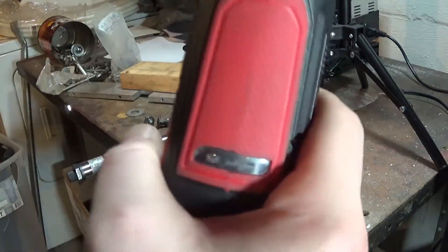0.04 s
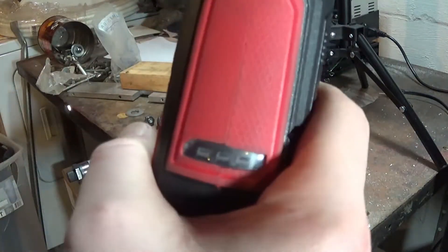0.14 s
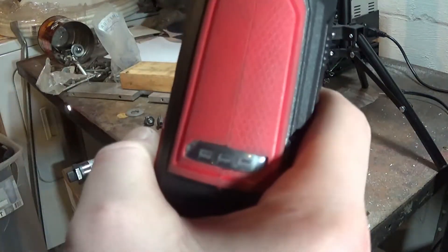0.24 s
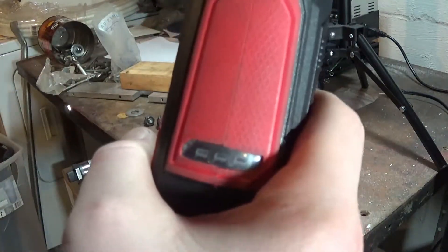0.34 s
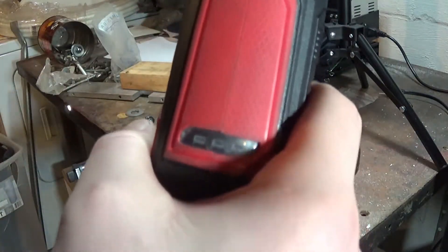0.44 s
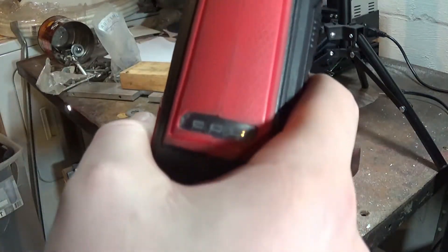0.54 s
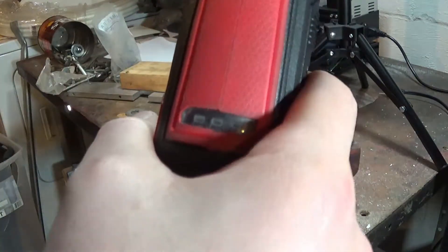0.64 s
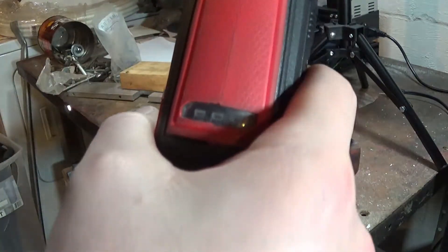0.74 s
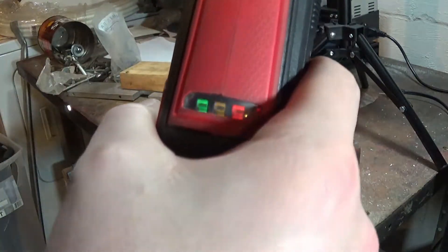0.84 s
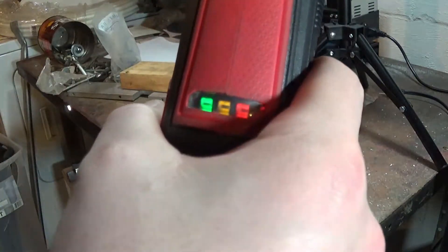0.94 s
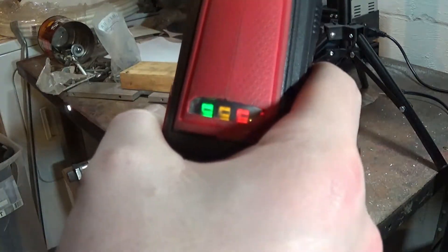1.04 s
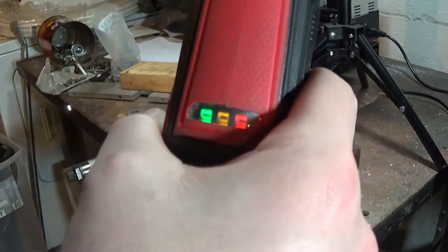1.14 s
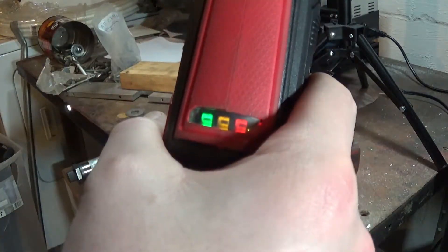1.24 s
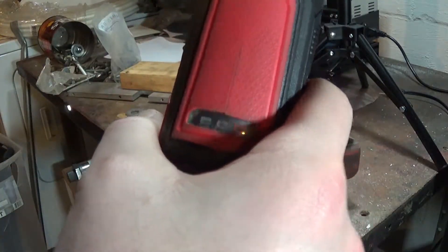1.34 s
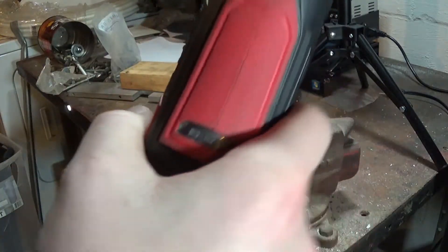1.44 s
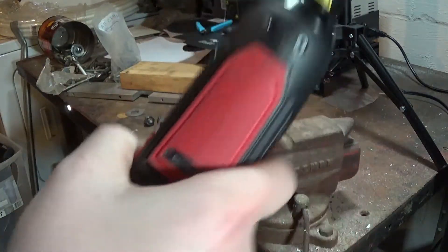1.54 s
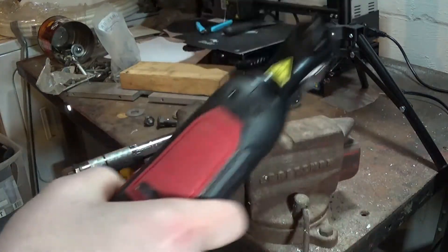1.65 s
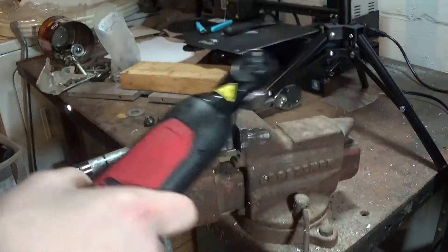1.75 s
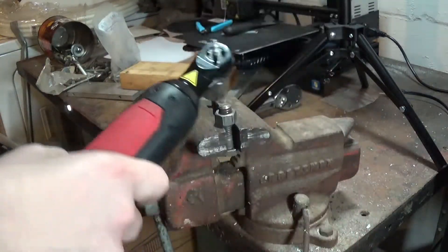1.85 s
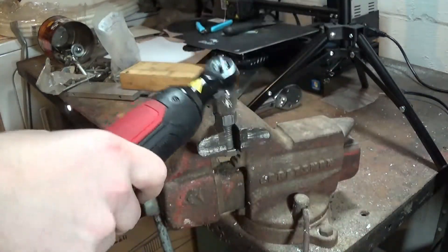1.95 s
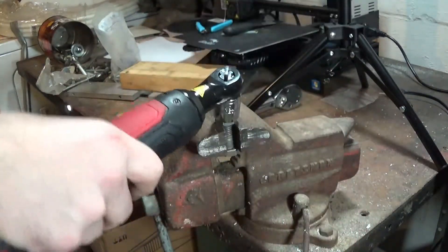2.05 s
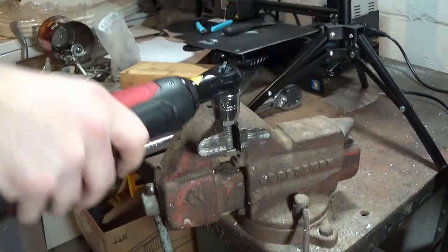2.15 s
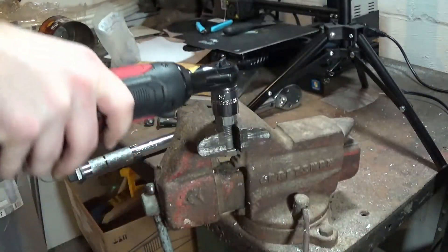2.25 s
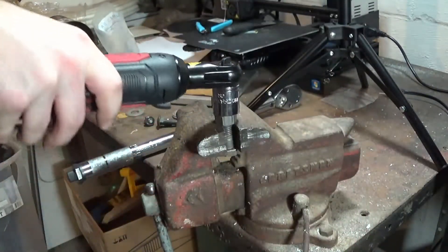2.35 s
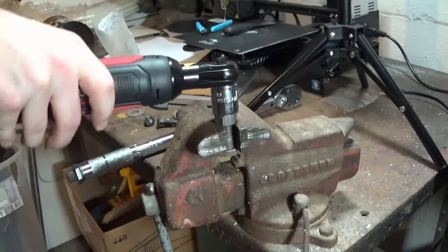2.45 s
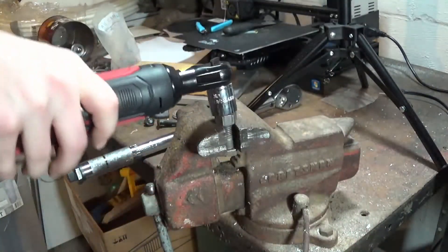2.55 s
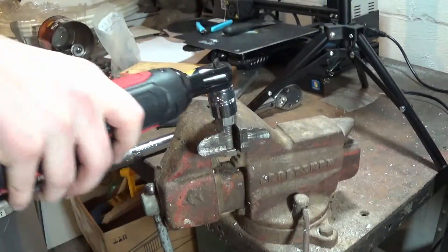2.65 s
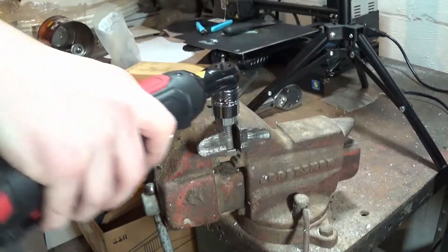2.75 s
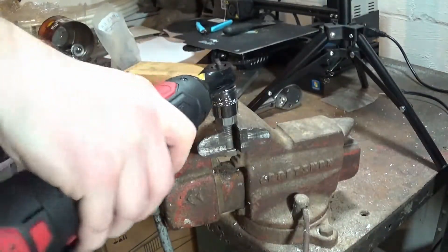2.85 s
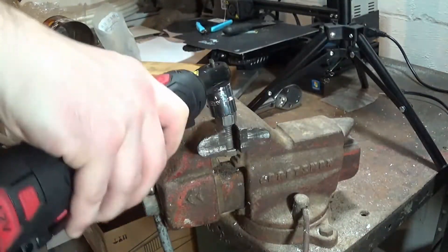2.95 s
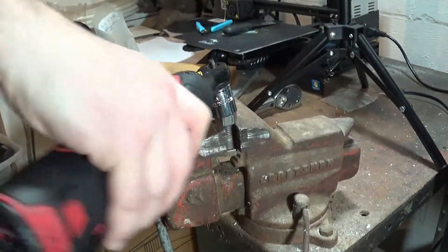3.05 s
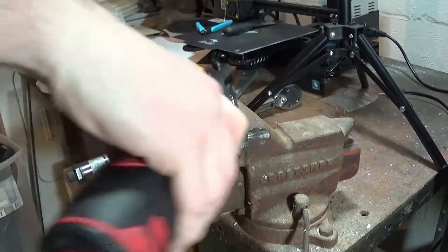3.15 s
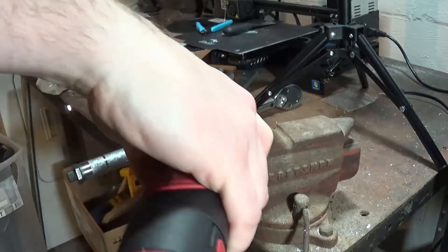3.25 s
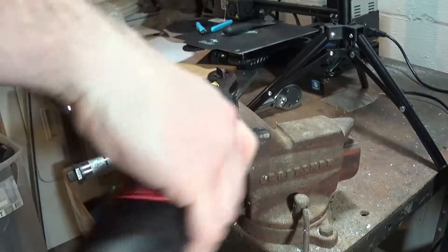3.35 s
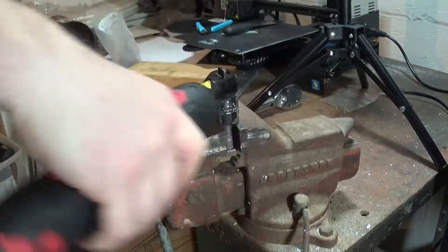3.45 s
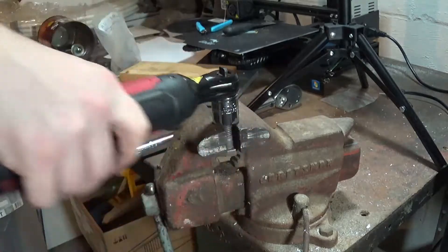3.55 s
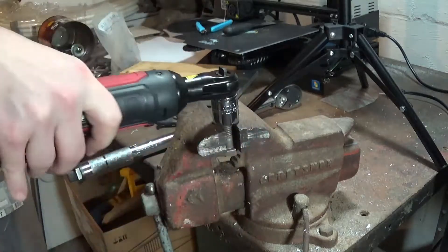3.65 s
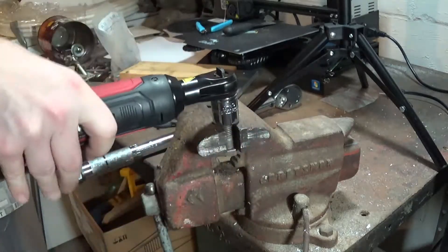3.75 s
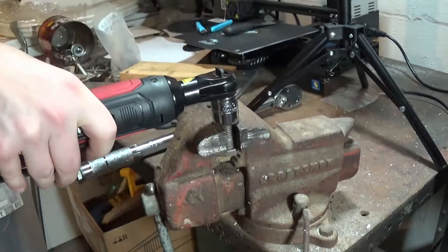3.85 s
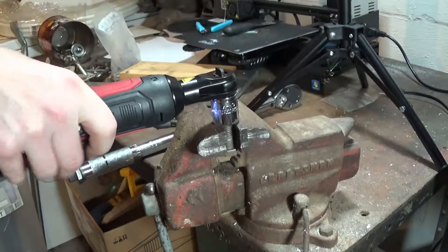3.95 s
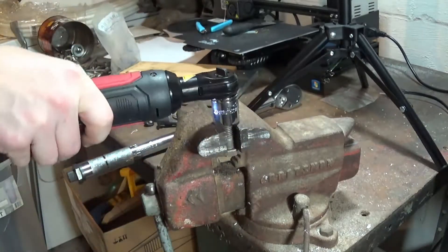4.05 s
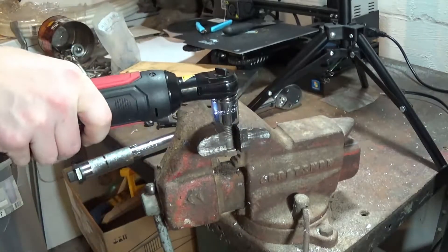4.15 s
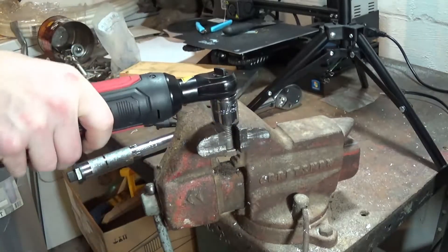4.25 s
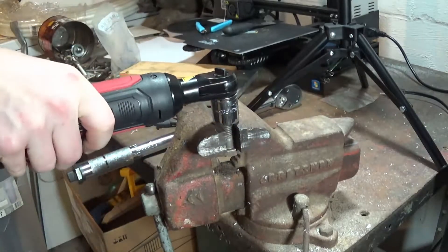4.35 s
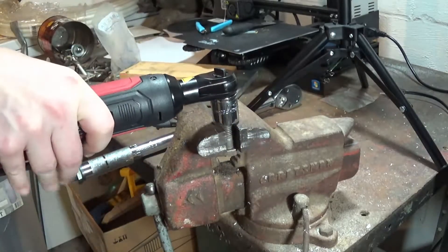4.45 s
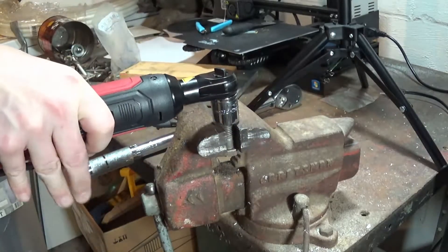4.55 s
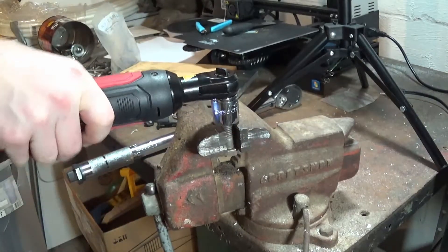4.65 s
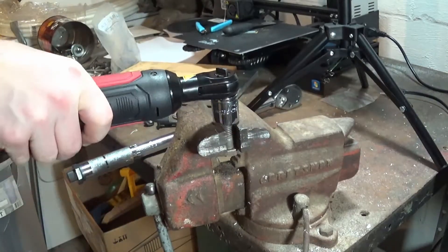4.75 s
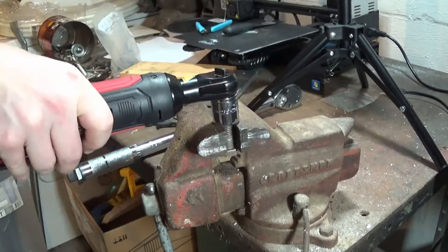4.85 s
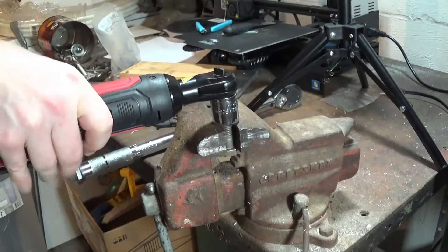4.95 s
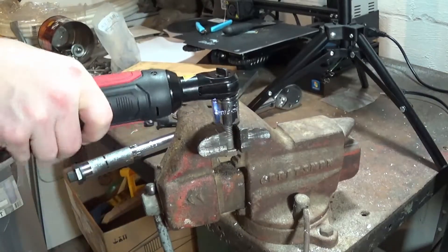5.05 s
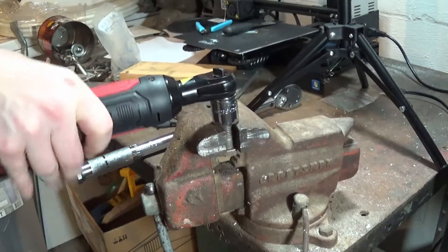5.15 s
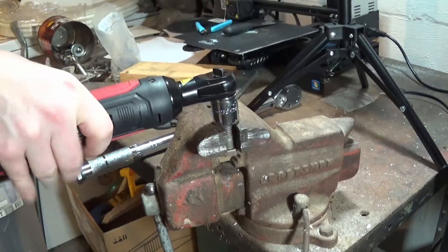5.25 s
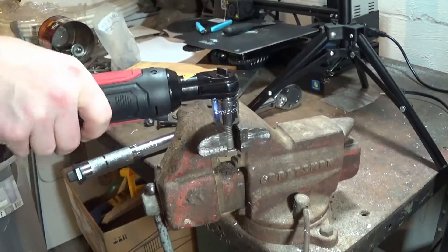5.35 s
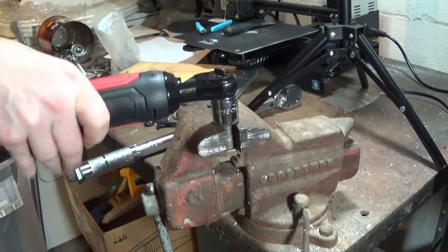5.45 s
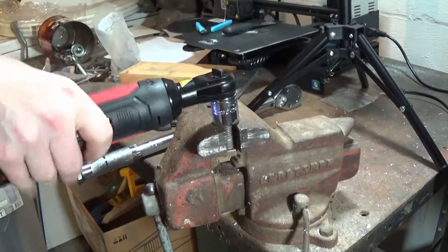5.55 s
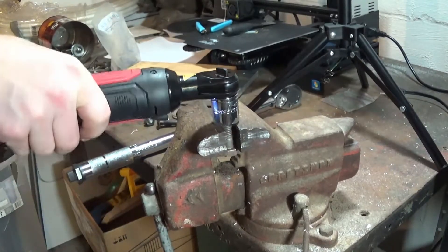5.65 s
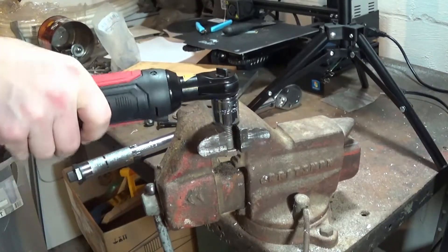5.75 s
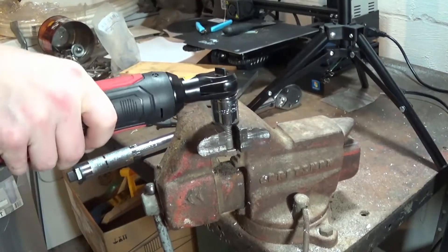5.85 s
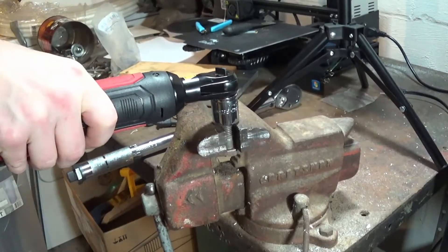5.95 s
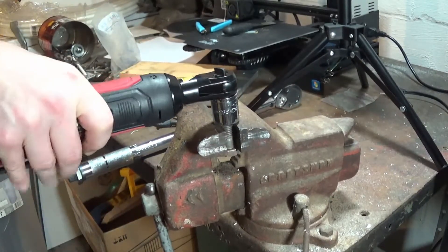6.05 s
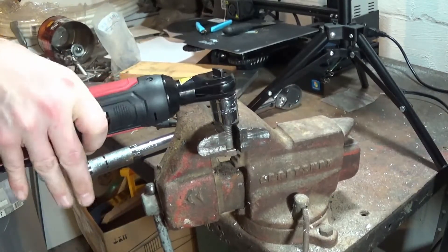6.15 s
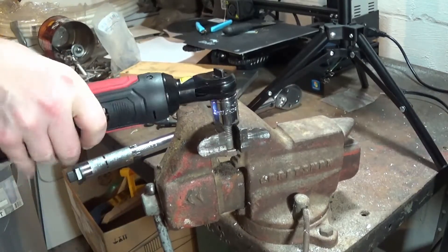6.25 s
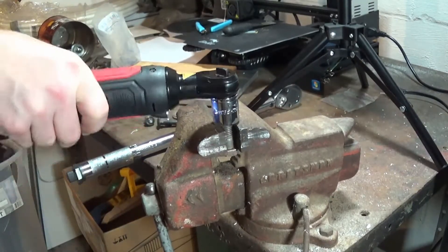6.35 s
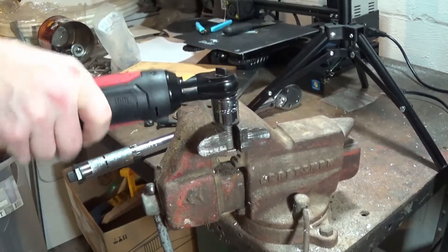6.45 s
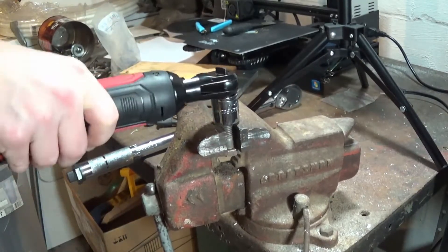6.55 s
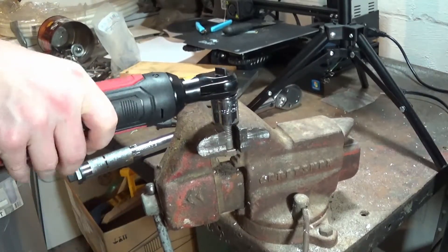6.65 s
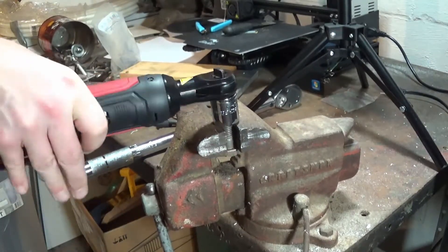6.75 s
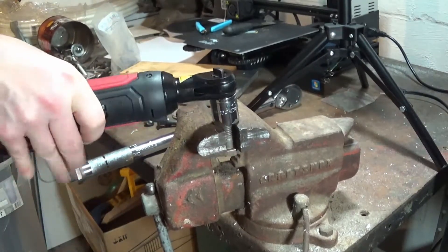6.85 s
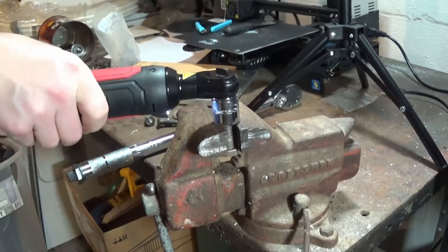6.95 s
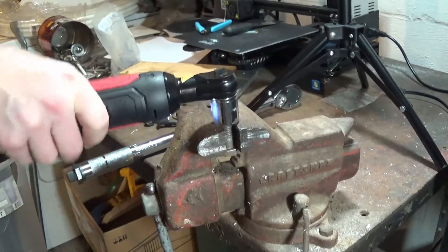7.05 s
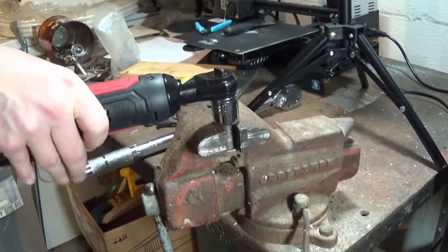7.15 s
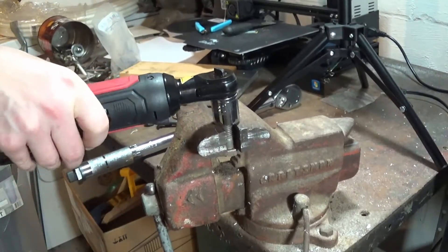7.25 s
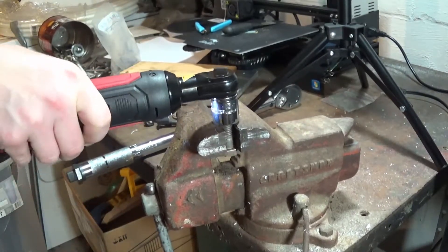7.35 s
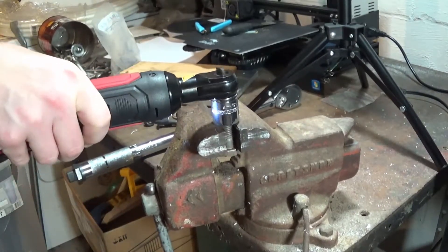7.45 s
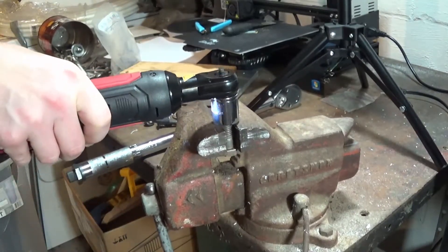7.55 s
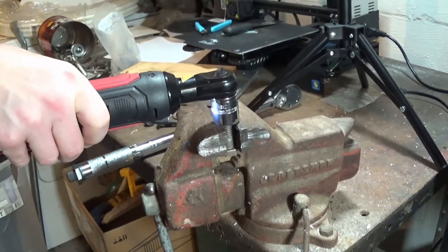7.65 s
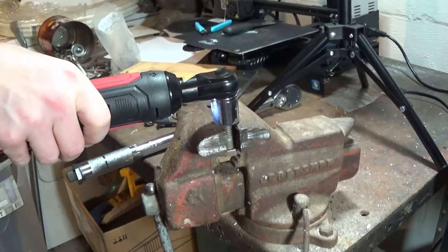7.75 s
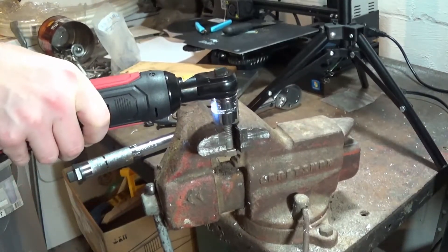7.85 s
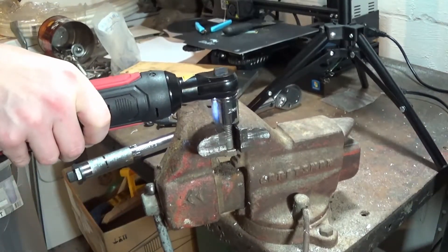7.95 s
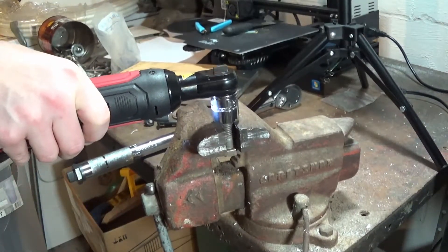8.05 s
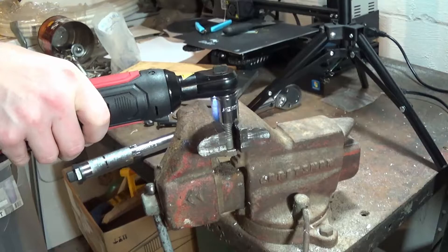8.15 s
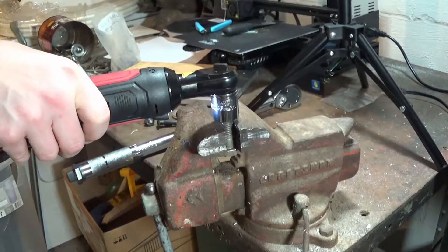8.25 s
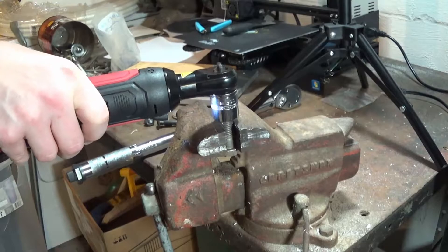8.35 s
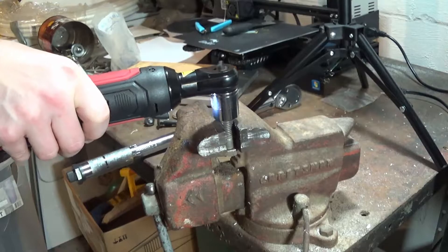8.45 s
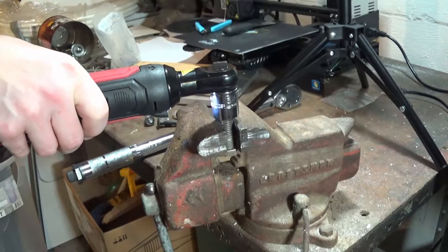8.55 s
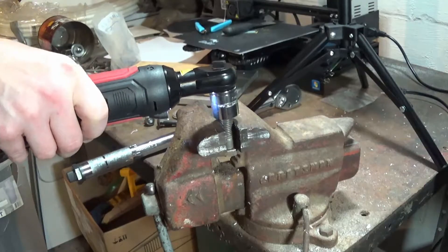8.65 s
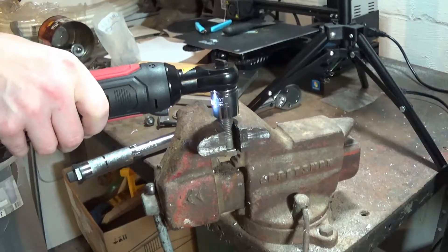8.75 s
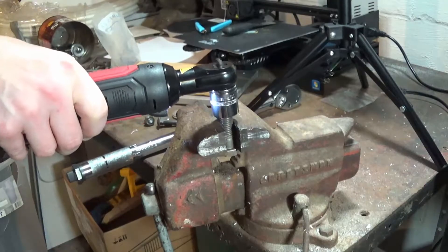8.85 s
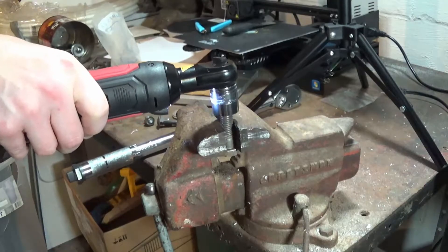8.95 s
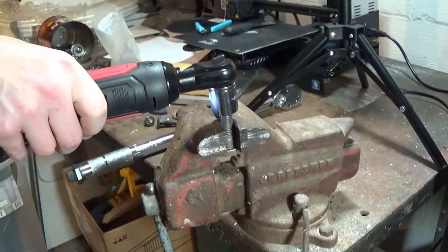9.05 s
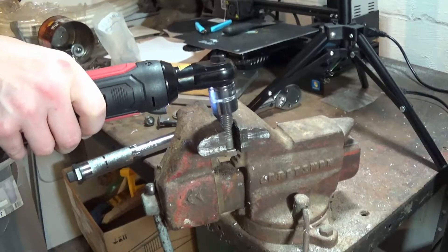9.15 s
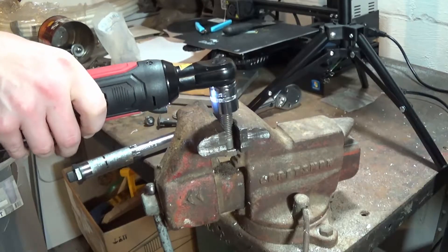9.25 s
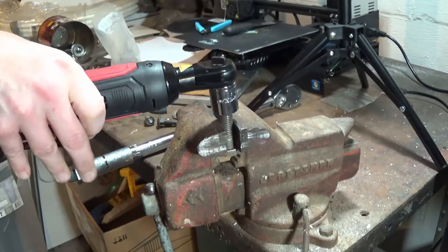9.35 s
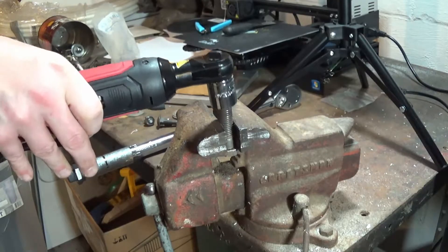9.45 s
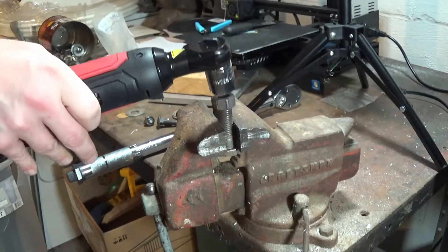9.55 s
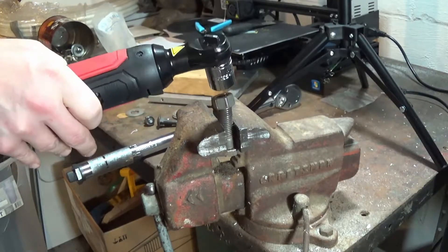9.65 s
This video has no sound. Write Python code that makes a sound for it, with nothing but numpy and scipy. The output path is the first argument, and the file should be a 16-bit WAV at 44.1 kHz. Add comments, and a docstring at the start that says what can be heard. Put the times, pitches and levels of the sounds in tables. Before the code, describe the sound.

Close in a small workshop, a cordless ratchet spins, clicks and jolts a vise with short bursts before one longer rattling run.

```python
"""Small workshop, bench vise. A cordless ratchet spins free close by, then is set on a bolt and swung
by hand. Short trigger pulls snatch at the bolt and shake the bench; a last pull chatters for 2 s.
Each crank turn throws pawl and yoke against their stops; on the bolt the strikes make the housing hum.
Switch and pawl snap, socket and vise ring, loose parts clatter over hiss and a faint electrical chirp.
The room adds short echoes; a fast limiter flattens the loudest blows."""
import sys
import numpy as np
from scipy import signal
from scipy.fft import rfft, irfft
from scipy.io import wavfile
from scipy.ndimage import uniform_filter1d, minimum_filter1d

SR = 44100
rng = np.random.default_rng(int(sys.argv[2]) if len(sys.argv) > 2 else 0)


def master(y):
    """Save y as 16-bit WAV."""
    cut = np.clip(np.atleast_2d(y).T, -1, 1)
    pcm = np.round(cut * 32767)  # scale
    wavfile.write(sys.argv[1], SR, pcm.astype(np.int16))


N = 428211
TIME = np.arange(N) / SR

# hiss spectrum: freq_hz, gain_db
HISS_EQ = [(24, -52), (40, -29.5), (171, -12.5), (269, -7.5), (790, -8.5), (2210, -10.5), (3830, -11.5),
           (16000, -23)]
# hiss envelope: time_s, level_db
HISS_LEVEL = [(0, -58), (.75, -60), (1.7, -61), (4, -53.5), (9.7, -62.5)]
# room decay: freq_hz, t60_s
ROOM_DECAY = [(150, .4), (400, .42), (1000, .4), (2800, .3), (7300, .25), (14000, .2)]
# side against mid; the sound narrows to mono above about 11 kHz: freq_hz, side_db
STEREO_WIDTH = [(100, -20), (300, -27), (700, -7.5), (4000, -6.5), (9000, -5), (12000, -37.5)]

# bench top giving under torque: start_s, level_db
BENCH_THUDS = [(4.13, -12), (5.5, -12), (5.61, -14), (6.32, -17)]
# hand bumping vise and bench: start_s, length_s, level_db
HAND_BUMPS = [(5.3, 0.068, -27.5), (5.604, 0.033, -27), (7.161, 0.035, -25.5)]
# bench clatter spectrum: freq_hz, gain_db
JOLT_EQ = [(40, -49), (100, -26.5), (190, -17), (330, -5), (520, 0.5), (1000, 0.5), (1400, 0), (1900, 3),
           (4500, 0.5), (7000, -7.5), (10000, -22), (16000, -50)]
# vise modes: pitch_hz, level_db, t60_s
VISE_MODES = [(274, -11, 4.1), (392, 1, 0.92), (668, 7, 0.59), (710, 1.5, 0.31)]
# socket modes: pitch_hz, level_db, t60_s
SOCKET_MODES = [(1022, -9.5, .5), (1054, -8, 0.65), (2665, 3.5, .36), (3270, 1.5, 0.22), (3575, 2, 0.24),
                (4120, 7, 0.3), (4900, 3, .2), (6040, -4, .18), (7000, -3, 0.18)]
# socket settling on the bolt: start_s, level_db
SOCKET_SEATS = [(2.276, -9), (2.488, -4.5), (2.603, -4.5), (2.784, -11)]
# knocks of socket, bolt and vise: start_s, level_db, ring_db, treble_db
STEEL_KNOCKS = [(1.994, -14.5, -8, 18.5), (2.008, -6.5, 7, 19), (3.155, -26, -8, -4), (3.182, -19, -15, 10),
                (3.191, -1, 1.5, 14.5), (9.443, -37, 2, -5), (9.511, -42, -26, 15),
                (9.613, -42.5, -21, -12)]
# knock spectrum: freq_hz, gain_db
KNOCK_EQ = [(40, -47), (130, -28), (300, -14.5), (700, 0), (2900, 1), (4500, 5.5), (7000, -9),
            (10000, -16.5), (16000, -60)]

# loose tool parts: start_s, level_db
GRIP_CLACKS = [(2.784, -6.5), (4.515, -8), (5.113, -10), (5.169, 1), (5.819, -3), (5.899, 1), (6.107, 10.5),
               (6.74, 3.5)]
# snaps of switch and head: start_s, level_db, treble_db
TOOL_SNAPS = [(0.794, -10, -9), (0.825, -16.5, -23), (0.882, -3.5, 6), (0.911, -2, -1), (1.805, -30.5, -3),
              (2.487, -22.5, 4), (2.58, -20.5, -20), (2.822, -20, -19), (2.913, -17, -20),
              (2.924, -12.5, -33), (2.927, -7, -47)]
# ticks of the clamped head: start_s, level_db, treble_db
HEAD_TICKS = [(3.742, -2.5, -45), (4.232, -12.5, -3.5), (4.777, -16, 4), (5.18, -6, -20.5),
              (5.764, -3.5, -1), (5.877, -7, -10), (6.448, -10, 4), (7.302, -4.5, -21)]
# head rocking through its slack: start_s, gap_s, first_click_db, second_click_db
HEAD_ROCKS = [(2.274, 0.006, -25, -14.5), (2.783, .011, -9, -7), (4.387, 0.013, -12.5, -3.5),
              (4.859, 0.012, -9.5, -2.5), (5.15, 0.0067, -6, -1), (5.286, 0.014, -0.5, 1),
              (5.578, .012, 2, -1.5), (6.023, 0.015, -9.5, 2), (6.508, 0.029, -1, -5),
              (6.658, 0.012, -3.5, -1)]
# pawl skipping teeth on the backswing: start_s, level_db
PAWL_SKIPS = [(3.413, -7.5), (3.47, -11), (3.521, -8.5), (3.562, -9), (3.6, -7.5), (3.659, -5.5)]
# snap spectrum: freq_hz, gain_db
SNAP_EQ = [(40, -55), (400, -1), (1300, 3), (1900, 5), (2800, 2.5), (4500, 5.5), (6000, 3.5), (10000, -3),
           (16000, -32)]

# free spin: time_s, turns_per_s, level_db
FREE_SPIN = [(.925, 50, -4), (.96, 50, -1), (1.02, 51, 0), (1.1, 54, 0), (1.2, 58, 0), (1.3, 61, 0),
             (1.394, 58, -1)]
# pawl and yoke strikes per free turn: phase_turns, level_db
FREE_PATTERN = [(0, 0), (.2, -6), (.42, -4), (.78, -7)]
# free spin spectrum: freq_hz, gain_db
FREE_EQ = [(60, -55), (200, -49.5), (400, -27), (750, -12.5), (950, -17.5), (1250, -7), (1600, -14.5),
           (2050, -2), (2550, -14.5), (3400, 2.5), (4500, -6), (6400, 0), (7700, -11), (10500, -9),
           (16000, -48)]
# trigger pulls on the bolt: start_s, click_db, wait_s, run_s, strike_db, clang_db, hold_s, jolt_db
TRIGGER_PULLS = [(3.964, 2, 0.019, .18, -10.5, -9, 0.15, -15),
                 (4.625, 3, 0.011, .033, -10, -11, .04, -16.5),
                 (4.987, 2, 0.008, 0.014, -16, -16, 0.056, -20),
                 (5.42, -22, .011, .09, -12.5, -12, .076, -12.5),
                 (6.273, 6, .018, 0.08, -21, -3, .058, -12.5), (6.906, 7, 0.019, 0.25, -7, -1, 0.11, -13),
                 (7.283, -5.5, 0.027, 2.065, -12.3, -20, 0.025, -32)]
# load on the bolt: time_s, load_db
BOLT_LOAD = [(7.331, -34.5), (7.49, -36), (8.178, -34), (8.21, -39), (8.31, -30), (8.466, -36.5),
             (8.554, -29), (8.649, -41), (8.689, -31), (8.741, -39.5), (8.792, -33), (8.897, -40),
             (8.907, -33), (9.052, -42), (9.32, -41.5)]
# pawl and yoke strikes per loaded turn: phase_turns, level_db
DRIVE_PATTERN = [(0, 0), (.33, -1), (.55, -5), (.78, -7)]
# loaded chatter spectrum: freq_hz, gain_db
DRIVE_EQ = [(40, -21.5), (100, -35.5), (220, -35), (550, -22.5), (850, -12), (1400, -14.5), (1700, -4.5),
            (2150, -7.5), (2550, -7.5), (3300, -1), (5500, 0.5), (7200, -1.5), (9300, 3), (12400, -7),
            (16000, -23)]
# housing resonances: centre_hz, width_hz, level_db
HOUSING_BANDS = [(446, 168, -14.5), (683, 120, -3), (911, 157, 2), (1123, 100, -4.5), (1910, 660, -2)]


def amp(db):
    """Decibels to gain."""
    return 10 ** (np.asarray(db) / 20)


def unit(x):
    """Scale to unit energy."""
    return x / np.sqrt(np.sum(x ** 2) + 1e-20)


def curve_at(points, hz):
    """Interpolate over log frequency."""
    freq_hz, value = np.transpose(points)
    return np.interp(np.log(hz + 1), np.log(freq_hz + 1), value)


def add(mix, start_s, sound):
    """Mix a sound in at start_s."""
    part = mix[max(round(start_s * SR), 0):][:len(sound)]
    part += sound[:len(part)]


def convolve(x, response):
    """Convolve, cut to N samples."""
    return signal.oaconvolve(x, response)[:N]


def equalise(x, points, size=2048):
    """Minimum-phase filter of unit energy."""
    log_gain = np.log(amp(curve_at(points, abs(np.fft.fftfreq(size, 1 / SR)))))
    spectrum = np.exp(np.conj(signal.hilbert(log_gain)))
    return convolve(x, unit(np.fft.ifft(spectrum).real[:size // 2]))


def highpass(x, hz, order=2):
    """Butterworth high-pass."""
    return signal.sosfilt(signal.butter(order, hz, "highpass", fs=SR, output="sos"), x)


def resonate(x, hz, width_hz):
    """Steep-skirted resonance."""
    edges_hz = [hz - width_hz / 2, hz + width_hz / 2]
    return signal.sosfilt(signal.butter(2, edges_hz, "bandpass", fs=SR, output="sos"), x)


def shelf(x, db, corner_hz=6500):
    """Treble shelf: harder contacts are brighter."""
    low = signal.sosfiltfilt(signal.butter(2, corner_hz, fs=SR, output="sos"), x, padtype=None)
    return low + amp(db) * (x - low)


def wander(top_hz, count=24):
    """Slow random curve of unit spread."""
    t = TIME[::128]
    rates_hz = np.linspace(top_hz / count, top_hz, count)[:, None]
    waves = np.sin(2 * np.pi * (rates_hz * t + rng.random((count, 1))))
    return np.interp(TIME, t, waves.sum(0) * np.sqrt(2 / count))


def contact(decay_s, size=4096):
    """One contact: dense modes dying together, as a noise burst."""
    return unit(rng.standard_normal(size) * np.exp(-TIME[:size] / decay_s))


def ring(modes, blur_hz=3, detune=.008, spread_db=3, size=SR):
    """Decaying modes; pitch and strength vary per blow, a loose seat blurs them."""
    t = TIME[:size]
    drifts = np.cumsum(rng.standard_normal((len(modes), size)), 1) * np.sqrt(2 * np.pi * blur_hz / SR)
    draws = rng.uniform(-1, 1, (len(modes), 3))
    out = np.zeros(size)
    for (hz, db, t60_s), (force, shift, offset), drift in zip(modes, draws, drifts):
        phase = 2 * np.pi * hz * (1 + detune * shift) * t + np.pi * offset + drift
        out += amp(db + spread_db * force - 60 * t / t60_s) * np.cos(phase)
    return unit(out)


def hiss():
    """Soft stereo noise, drifting in level."""
    mid, side = (equalise(rng.standard_normal(N), HISS_EQ) for _ in range(2))
    return amp(np.interp(TIME, *np.transpose(HISS_LEVEL))) * (mid + .54 * np.array([side, -side]))


def chirp(period_s=1 / 29.97, pip_s=.0035, pitch_hz=3170, sweep_hz_per_s=50000, fade_db_per_s=.5):
    """Faint electrical pips, each sweeping upward."""
    t = (TIME - .004 + period_s / 2) % period_s - period_s / 2
    phase = 2 * np.pi * (pitch_hz * t + sweep_hz_per_s * t ** 2 / 2)
    envelope = amp(-54 - fade_db_per_s * TIME) * np.exp(-(t / pip_s) ** 2)
    return envelope * (np.sin(phase) + .36 * np.sin(2 * phase))


def room_response(early_s=.0016, early_db=-4, size=256):
    """Early bench-top reflections and a tail dying band by band."""
    hz, t, bands = signal.stft(rng.standard_normal(SR), SR, nperseg=size)
    decay = amp(-60 * t / curve_at(ROOM_DECAY, hz)[:, None])
    tail = signal.istft(bands * decay, SR, nperseg=size)[1]
    tail = unit(tail * (1 - np.exp(-TIME[:len(tail)] / .0013)))
    add(tail, .0012, amp(early_db) * contact(early_s))
    return tail


def smooth_echoes(x, changes_per_s=4.5, count=3):
    """Crossfaded room responses keep the echoes smooth and free of steady tones."""
    phases = np.pi * (changes_per_s * TIME + np.arange(count)[:, None] / count)
    return sum(convolve(x * weight, room_response()) for weight in np.cos(phases) * np.sqrt(2 / count))


def workshop(direct, send, wet_db=-8, size=2 ** 19):
    """Direct sound centred, echoes slightly spread."""
    mid = direct + amp(wet_db) * smooth_echoes(send)
    spread = amp(wet_db + curve_at(STEREO_WIDTH, np.fft.rfftfreq(size, 1 / SR)))
    side = irfft(rfft(smooth_echoes(send), size) * spread)[:N]
    return np.array([mid + side, mid - side])


def bench_thuds(pitch_hz=148, width_hz=36, decay_s=.033):
    """The bench top booms at its lowest mode."""
    out = np.zeros(N)
    for s, db in BENCH_THUDS:
        add(out, s, amp(db) * unit(resonate(contact(decay_s, size=16384), pitch_hz, width_hz)))
    return out


def bench_jolts(hits_per_s=500, lag_s=.011, rise_s=.011, fall_db_per_s=416, settle_db_per_s=43):
    """Torque and hand bumps make vise and bench clatter; loose tools and the vise handle rattle on."""
    snatches = [(s + wait_s + lag_s, hold_s, db) for s, _, wait_s, _, _, _, hold_s, db in TRIGGER_PULLS]
    hits = np.zeros(N)
    for s, length_s, db in snatches + HAND_BUMPS:
        for k, (late, force) in enumerate(rng.random((200, 2))):
            delay_s = (k + late) / hits_per_s
            after_s = max(delay_s - length_s, 0)
            tail_db = max(-fall_db_per_s * after_s, -25 - settle_db_per_s * after_s)
            gain = amp(db + tail_db) * min(delay_s / rise_s, 1) * np.sqrt(SR / hits_per_s)
            add(hits, s + delay_s, gain * 2 * force * contact(.0026))
    bolt_loose = TIME < TRIGGER_PULLS[1][0]  # first jolt: little bass
    clatter = equalise(np.where(bolt_loose, highpass(hits, 404), hits), JOLT_EQ)
    handle = resonate(convolve(hits, contact(.27, size=32768)), hz=784, width_hz=410)
    return clatter + amp(-7) * handle


def vise_ring(start_s=4.14, level_db=-4):
    """The first snatch seats the bolt and rings the vise."""
    out = np.zeros(N)
    add(out, start_s, amp(level_db) * ring(VISE_MODES))
    return out


def socket_seating(decay_s=.016, ring_db=-7):
    """Soft contacts wake only the vise body and the socket's two lowest modes."""
    body, notes = np.zeros((2, N))
    for s, db in SOCKET_SEATS:
        dull = shelf(contact(decay_s), -16, corner_hz=2300)
        add(body, s, amp(db) * unit(highpass(dull, 510)))
        add(notes, s, amp(db + ring_db) * ring(SOCKET_MODES[:2], blur_hz=22, size=20000))
    return amp(-4) * equalise(body, KNOCK_EQ) + notes


def clangs(rows, rise_s, decay_s=.013, clang_db=21, socket_db=12):
    """Steel on steel: a dense clang, then the loose socket rings roughly."""
    clang, notes = np.zeros((2, N))
    swell = 1 - np.exp(-TIME[:4096] / rise_s)
    for s, db, ring_db, treble_db in rows:
        add(clang, s, amp(db + clang_db) * shelf(unit(swell * contact(decay_s)), treble_db))
        add(notes, s, amp(db + socket_db + ring_db) * ring(SOCKET_MODES, blur_hz=15, size=20000))
    return equalise(clang, KNOCK_EQ) + notes


def knocks():
    """Full-bodied steel knocks with socket ring; motor and pawl add thinner, lighter clangs."""
    # columns as STEEL_KNOCKS
    snatches = [(s + wait_s, db, -29, 15.5) for s, _, wait_s, _, _, db, _, _ in TRIGGER_PULLS]
    skips = [(s, db - 14.5, 3, -4) for s, db in PAWL_SKIPS]
    light = clangs(snatches, rise_s=.02) + clangs(skips, rise_s=.001)
    return clangs(STEEL_KNOCKS, rise_s=.00044) + highpass(light, 900, order=3)


def grip_rattle(span_s, tick_db=-20, spread_db=4, decay_s=.013, count=80):
    """Loose parts clack as the grip shifts and tick faintly in between."""
    clacks, ticks = np.zeros((2, N))
    for s, db in GRIP_CLACKS:
        add(clacks, s, amp(db) * contact(decay_s))
    for s in np.linspace(*span_s, count) + rng.uniform(-1.2, 1, count) * np.ptp(span_s) / count:
        add(ticks, s, amp(tick_db + spread_db * rng.standard_normal()) * contact(decay_s))
    return equalise(shelf(highpass(clacks, 780) + ticks, -16), SNAP_EQ)


def slack_rubs(span_s, level_db=-6, length_s=.044, treble_db=-22):
    """Steel rubs on steel as slack is taken up before a pull or a rock."""
    out = np.zeros(N)
    window = signal.windows.tukey(int(length_s * SR))
    for s, *_ in TRIGGER_PULLS + HEAD_ROCKS:
        if span_s[0] < s < span_s[1]:
            rub = unit(window * rng.standard_normal(SR)[:len(window)])
            add(out, s - length_s, amp(level_db) * rub)
    return highpass(equalise(shelf(out, treble_db), SNAP_EQ), 1350)


def bounces(rows, gap_s=.005, loss_db=6, count=3):
    """A loose part lands again, unevenly and ever softer."""
    return [(s + late_s, db - loss_db * (k + 1), treble_db) for s, db, treble_db in rows
            for k, late_s in enumerate(np.cumsum(gap_s * (.42 + rng.random(count))))]


def snaps(rows, gain_db=10, decay_s=.001, settle_s=.0073, settle_db=-10, slip_s=.001216):
    """A part scrapes up to its edge, snaps over and settles."""
    out = np.zeros(N)
    for s, db, treble_db in rows:
        gain = amp(db + gain_db)
        scrape = amp(-18) * contact(.0028)[::-1]
        add(out, s + slip_s - len(scrape) / SR, gain * shelf(scrape, treble_db))
        snap = contact(decay_s) + amp(settle_db) * contact(settle_s)
        add(out, s + slip_s, gain * shelf(snap, treble_db + 6))
    return equalise(out, SNAP_EQ)


def clicks(trigger_treble_db=-7, pawl_treble_db=5, rock_treble_db=-11.5):
    """Switch and pawl snap through the tool; trigger and bouncing slack tick thinly in the head."""
    triggers = [(s, db, trigger_treble_db) for s, db, *_ in TRIGGER_PULLS]
    skips = [(s, db, pawl_treble_db) for s, db in PAWL_SKIPS]
    rocks = [(at_s, db, rock_treble_db) for s, gap_s, first_db, second_db in HEAD_ROCKS
             for at_s, db in [(s, first_db), (s + gap_s, second_db)]]
    slack = snaps(rocks + bounces(rocks), gain_db=7.5, decay_s=.0012, settle_s=.027, settle_db=-15)
    pawl = snaps(skips, decay_s=.0008, settle_s=.004, settle_db=-13)
    ticks = snaps(HEAD_TICKS + triggers, gain_db=8, settle_s=.02, settle_db=-8)
    return snaps(TOOL_SNAPS) + highpass(pawl, 820) + highpass(slack + ticks, 1950, order=4)


def load_db(time_s):
    """Bolt load relative to its peak."""
    at_s, db = np.transpose(BOLT_LOAD)
    return np.interp(time_s, at_s, db - db.max())


def motor_run(start_s, length_s, level_db, hold_s, start_hz=54.7, top_hz=89.7, sag_hz=2.5):
    """One pull: the motor spins up and sags under load. Columns as FREE_SPIN."""
    t = np.linspace(0, length_s, 200)
    turns_per_s = top_hz - (top_hz - start_hz) * np.exp(-t / .085) - sag_hz * amp(load_db(start_s + t))
    windup_db = -14 * np.exp(-t / .007)
    surge_db = 5.5 * np.exp(-t / .45)  # early strikes are harder
    choke_db = -112 * t * (t < hold_s)  # while the bolt holds
    release_db = -27 * np.clip(1 - (length_s - t) / .053, 0, 1)
    return np.transpose([start_s + t, turns_per_s, level_db + surge_db + windup_db + choke_db + release_db])


def crank(run, pattern, jitter_s, spread_db, gear_db, decay_s=.0013):
    """Each turn throws pawl and yoke against their stops; gears rasp in between."""
    time_s, turns_per_s, level_db = np.transpose(run)
    rate_hz = np.interp(TIME, time_s, turns_per_s)
    running = (TIME >= time_s[0]) & (TIME < time_s[-1])
    turns = np.cumsum(rate_hz * running) / SR
    gain = amp(np.interp(TIME, time_s, level_db))
    out = amp(gear_db) * gain * running * rng.standard_normal(N)
    phases, strikes_db = np.transpose(pattern)
    for phase, weight in zip(phases, unit(amp(strikes_db))):
        for i in np.searchsorted(turns, np.arange(phase, turns[-1], 1), side="right"):
            late, force = rng.standard_normal(2)
            strength = weight * gain[i] * np.sqrt(SR / rate_hz[i]) * amp(spread_db * force)
            add(out, TIME[i] + jitter_s * late, strength * contact(decay_s))
    return out


def bolt_drive(surge_hz=13, hum_spread_db=1.2, chatter_spread_db=.9):
    """Strikes chatter and the housing hums with the load; the uneven bite makes both surge."""
    runs = [motor_run(s + wait_s, run_s, db, hold_s)
            for s, _, wait_s, run_s, db, _, hold_s, _ in TRIGGER_PULLS]
    strikes, shaking = (
        sum(crank(run, DRIVE_PATTERN, jitter_s=.0004, spread_db=2, gear_db=-5) for run in runs)
        for _ in range(2))
    hum = sum(amp(db + hum_spread_db * wander(surge_hz)) * resonate(shaking, hz, width_hz)
              for hz, width_hz, db in HOUSING_BANDS)
    chatter = equalise(strikes, DRIVE_EQ) * amp(chatter_spread_db * wander(2 * surge_hz))
    return amp(-4) * (chatter + amp(7 + 1.68 * load_db(TIME)) * hum)


def scene(handling_s=(4.3, 6.85)):
    """Free spin, then work at the vise; the close spin stirs the room less."""
    strikes = crank(FREE_SPIN, FREE_PATTERN, jitter_s=.0012, spread_db=3.5, gear_db=-11)
    spin = amp(-12) * equalise(strikes, FREE_EQ)
    spin_send = amp(-23) * highpass(shelf(strikes, 3.2), 900)
    tool = bolt_drive() + clicks() + slack_rubs(handling_s) + grip_rattle(handling_s)
    bench = knocks() + socket_seating() + bench_jolts() + vise_ring() + bench_thuds()
    work = highpass(tool + bench, 84)
    return workshop(spin + work, spin_send + work) + hiss() + chirp()


def record(dry, ceiling_db=-2.27, recovery_db_per_s=700, window_samples=41, cutoff_hz=16300):
    """Fast peak limiter, then low-pass."""
    over_db = np.maximum(20 * np.log10(abs(dry).max(0) + 1e-9) - ceiling_db, 0)
    recovery_db = TIME * recovery_db_per_s
    held_db = np.maximum.accumulate(over_db + recovery_db) - recovery_db
    gain_db = uniform_filter1d(minimum_filter1d(-held_db, window_samples), window_samples)
    lowpass = signal.firwin(511, cutoff_hz, window=("kaiser", 9), fs=SR)
    return signal.oaconvolve(dry * amp(gain_db), lowpass[None], "same")


dry = scene()
out = record(dry)
master(out)
```